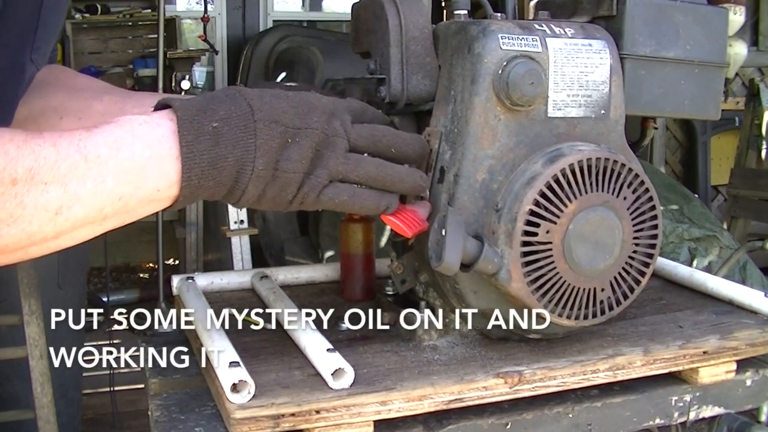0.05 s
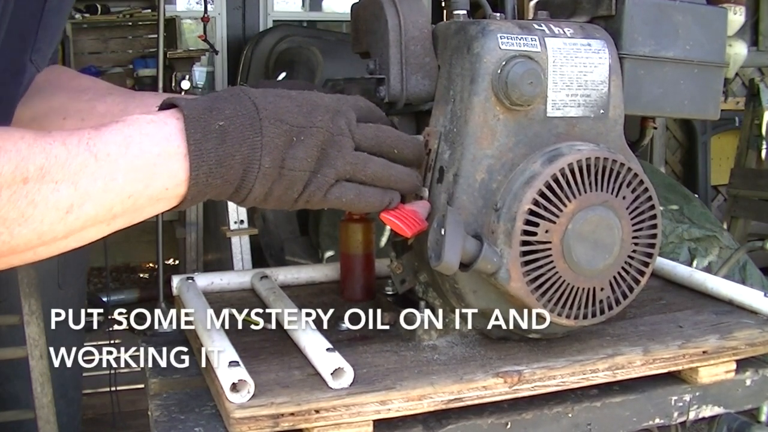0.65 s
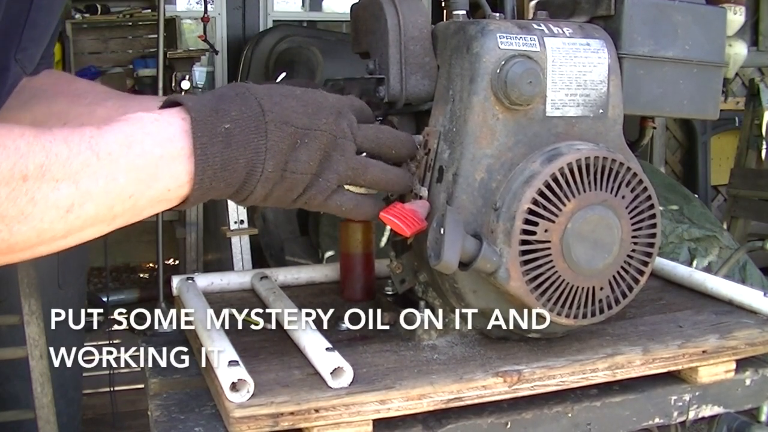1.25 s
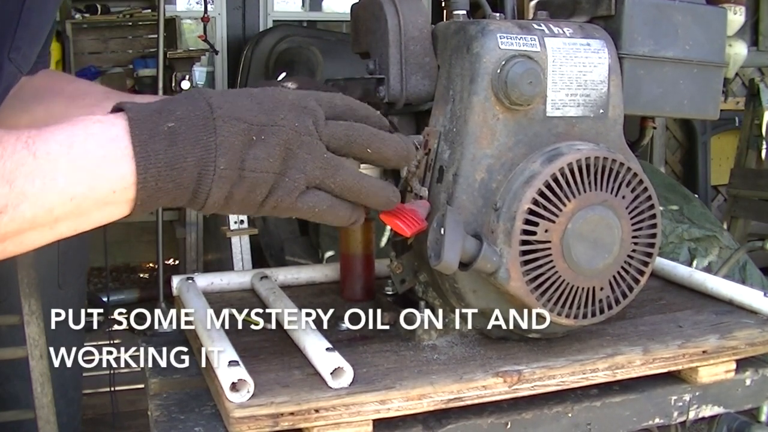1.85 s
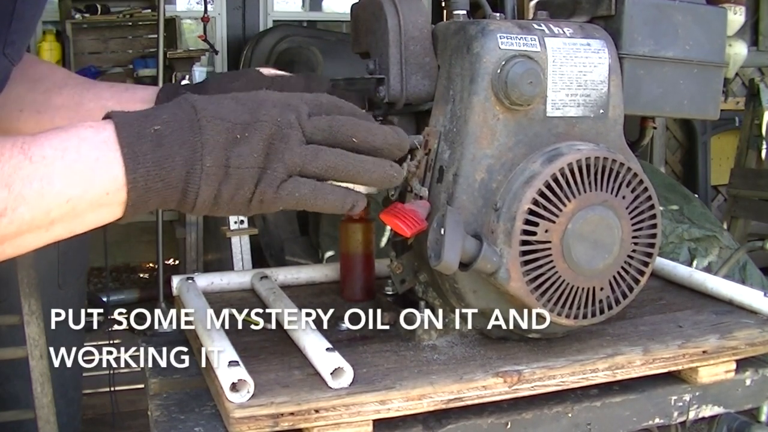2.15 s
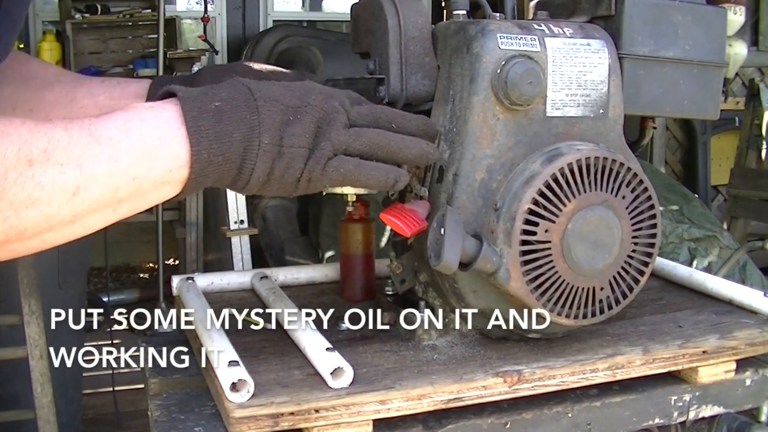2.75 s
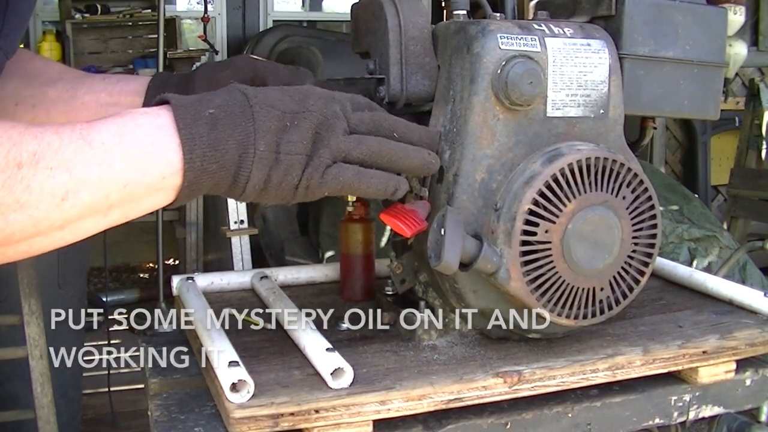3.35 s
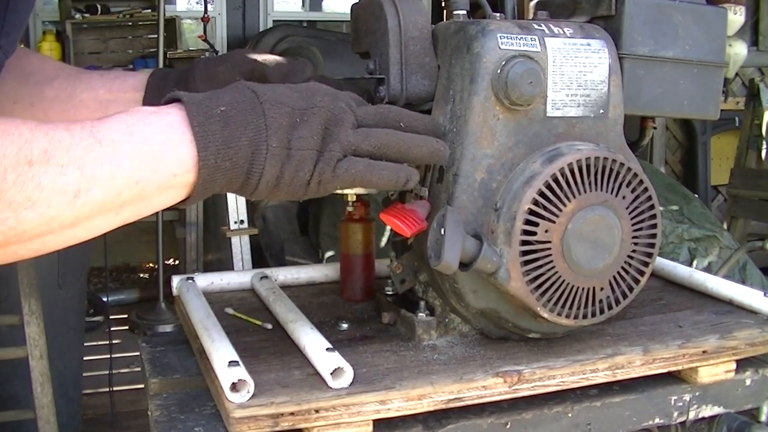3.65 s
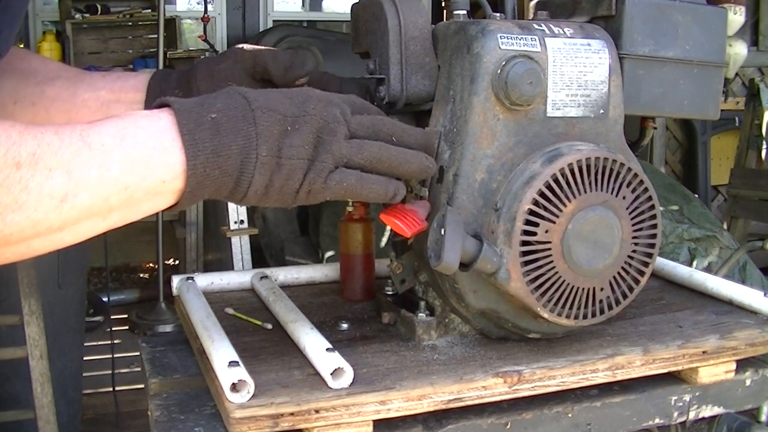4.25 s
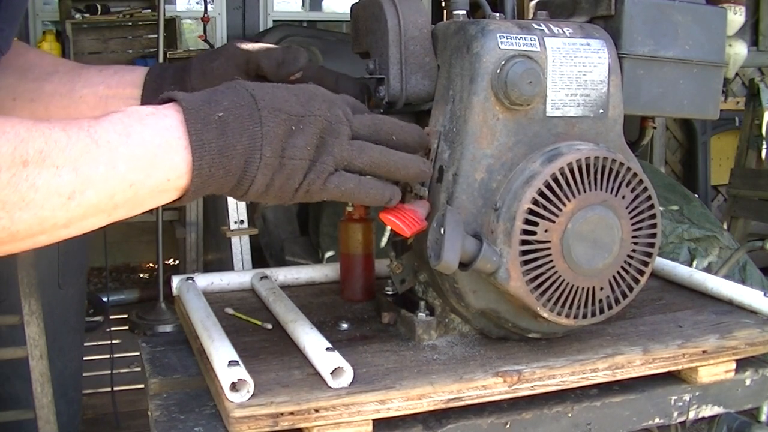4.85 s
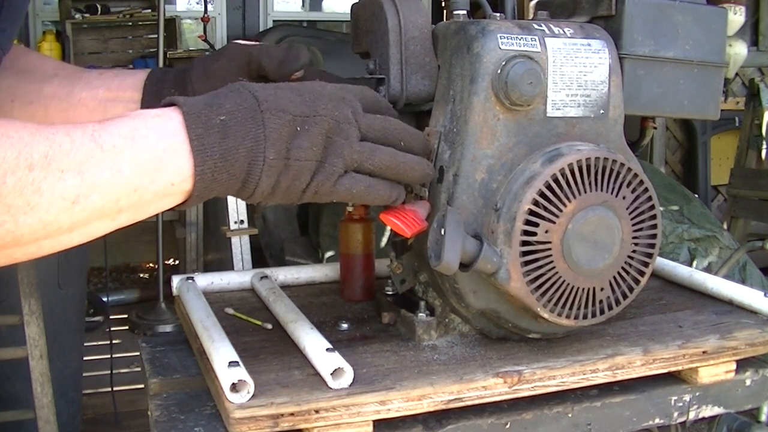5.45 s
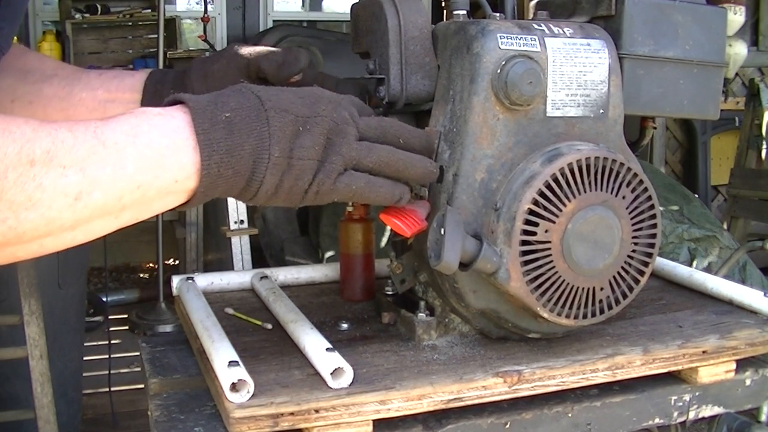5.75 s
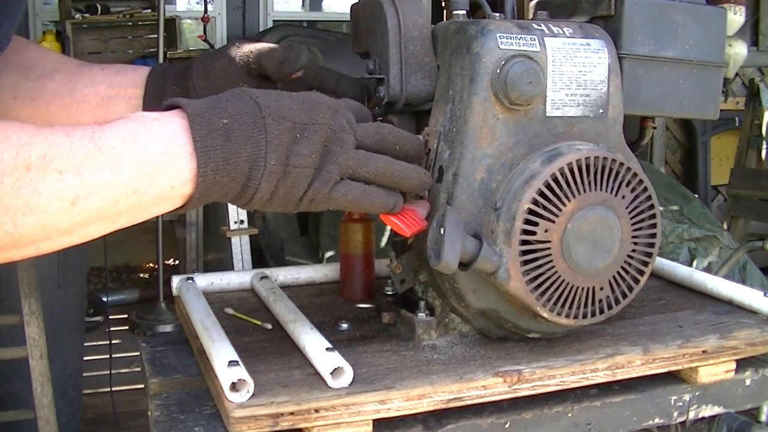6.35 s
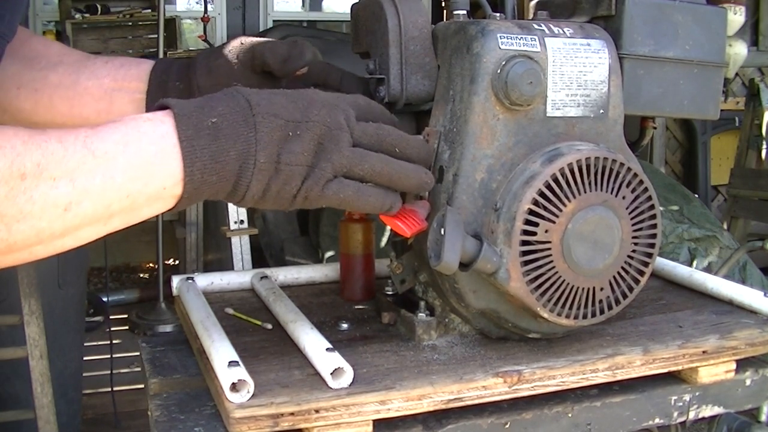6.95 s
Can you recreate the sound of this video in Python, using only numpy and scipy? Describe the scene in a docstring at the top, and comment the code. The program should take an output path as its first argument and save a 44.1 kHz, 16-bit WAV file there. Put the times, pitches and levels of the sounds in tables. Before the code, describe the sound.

Close, small metallic snaps alternate with duller clacks as a carburetor linkage is moved by hand on an engine that is not running. A return spring pings lightly and a glove rubs faintly on the metal. After a short weaker spell, the clicking settles into a regular back and forth. A breeze buffets the microphone with low, fluttering gusts over a quiet outdoor hush.

```python
"""Throttle linkage of a stopped engine

A gloved hand works the lever of a small engine back and forth on an outdoor bench. It snaps brightly
against one stop and clacks duller against the other, ringing the engine's metal. The return spring
pings, the glove rubs, a shed wall adds a short wash. Eddies of a breeze buffet the microphone."""
import sys
import numpy as np
from scipy import signal
from scipy.fft import rfft, irfft
from scipy.io import wavfile
from scipy.ndimage import uniform_filter1d

SR = 44100
rng = np.random.default_rng(int(sys.argv[2]) if len(sys.argv) > 2 else 0)


def pcm_store(signal):
    """Save signal as 16-bit PCM."""
    levels = np.round(np.clip(np.atleast_2d(signal), -1, 1) * 32767)
    wavfile.write(sys.argv[1], SR, levels.astype(np.int16).T)


N = 308964
TIME_S = np.arange(N) / SR
RING_TIME_S = np.arange(SR * 2 // 5) / SR
SIDES = np.array([[1], [-1]])   # left, right

# lever on the hard stop (time [s], relative low-band level [dB], treble over that [dB], rattle scale [s])
SNAPS = [(0.1832, -31.5, 4, 0.0014), (0.7397, -30, -10, 0.0065), (1.1488, -29, -2, 0.0018),
         (1.7343, -32.5, -2, 0.0039), (2.558, -37, -10, 0.0096), (3.566, -29, 0.1, 0.00079),
         (4.0035, -26.5, 1, 0.0012), (4.4217, -28, 1, 0.0014), (5.2143, -26.5, -1.2, 0.0022),
         (5.5629, -27.5, -0.5, 0.0017), (5.9256, -28, -4, 0.0027), (6.2667, -28, 0.1, 0.0025),
         (6.623, -28.5, 0.3, 0.002)]
# lever on the other stop (time [s], relative low-band level [dB], treble over that [dB], rattle scale [s])
CLACKS = [(0.002, -40, -12.5, 0.0079), (0.4179, -33.5, -9, 0.0031), (0.9547, -33, -9, 0.004),
          (1.293, -38.5, -9, 0.0019), (1.4463, -40.5, -6.5, 0.002), (1.6025, -40, -13.5, 0.0023),
          (2.7841, -34, -6.5, 0.0015), (3.0459, -45, -2, 0.0013), (3.2583, -35.5, -8, 0.0021),
          (4.1861, -35.5, -14.5, 0.00096), (4.6171, -31.5, -7.5, 0.0033), (4.8249, -33, -7, 0.0066),
          (5.0023, -31, -7.5, 0.0012), (5.3643, -39.5, -19, 0.0011), (5.7517, -33, -8.5, 0.001),
          (6.1108, -33, -11.5, 0.0013), (6.4401, -38.5, -20, 0.0014), (6.806, -41.5, -17.5, 0.00065)]
# carburetor and shroud (frequency [Hz], t60 without glove [s], snap height [dB], clack height [dB])
ENGINE_MODES = [ (642, .06, -14, -9), (800, .05, -16, -12), (897, .08, -12, -7), (1243, .07, -2, -7),
                (1420, .04, -16, -9), (1530, .07, -9, -1), (1580, .12, -9, -12), (1675, .5, -10, -7),
                (1712, .12, -3, 1), (1915, .09, -6, -12), (2060, .07, -9, -12), (2170, .05, -6, -8),
                (2252, .1, -2, -9), (2396, .085, -4, -7), (2700, .05, -11, -10), (2820, .05, -12, -8),
                (3012, .07, -9, -11), (3402, .05, -13, -22), (3700, .06, -14, -24), (4200, .06, -13, -18),
                (4620, .05, -16, -23), (5248, .06, -11, -25), (5610, .07, -20, -22), (6970, .03, -11, -29),
                (7268, .04, -11, -24), (7860, .04, -15, -33), (9310, .04, -16, -32), (9630, .045, -13, -26),
                (10700, .03, -18, -24)]
# weaker engine modes (frequency [Hz], snap height [dB], clack height [dB])
ENGINE_CROWD = [(268, -11, -16.5), (700, -26, -18), (1060, -11.5, -20), (1510, -24.5, -14),
                (1943, -4, -19.5), (2600, -15.5, -13.5), (3250, -15.5, -48), (4140, -17.5, -24.5),
                (6140, -29.5, -41), (7200, -23, -38.5), (8900, -28.5, -44), (10370, -15.5, -42.5),
                (12350, -40.5, -40.5), (14500, -73, -50)]
# decay of weaker modes, engine and spring (frequency [Hz], t60 [s])
CROWD_DECAY = [(300, 0.14), (2000, 0.065), (5000, 0.11), (12000, 0.099), (15000, .015)]
# spring and link slip in their holes (time [s], low-band level [dB], treble over that [dB])
PINGS = [(0.1535, -59, 11.5), (0.309, -51.5, -8.5), (0.336, -52, -21), (0.4941, -43, -16),
         (0.529, -47.5, -17), (0.663, -53.5, -19), (0.7014, -64, 13), (0.755, -33.5, -9),
         (0.768, -44.5, -7), (0.796, -37.5, -16), (1.098, -45.5, -7.5), (1.19, -42.5, -12),
         (1.333, -40, -25), (1.8745, -48.5, -22), (2.1548, -49, -20), (2.179, -50.5, -27),
         (2.577, -45, -33), (2.612, -49.5, -25), (2.768, -49, -7), (3.023, -47.5, -19), (3.1249, -46.5, -7),
         (3.5463, -46.5, 1.5), (3.7225, -43.5, -18), (3.751, -44.5, -25), (3.7809, -44, -31),
         (3.9402, -44, -16), (4.063, -40, -15), (4.1471, -42, -16), (4.5005, -46, -22),
         (4.5494, -41.5, -15), (4.808, -43.5, -11), (5.0802, -44, -3.5), (5.139, -47.5, 4),
         (5.1712, -40, -8), (5.185, -40, -4), (5.4355, -47.5, -3), (5.483, -47.5, -15), (5.6525, -44, -10),
         (5.8653, -48, -2.5), (5.973, -39, -19), (5.9979, -43.5, -3), (6.227, -46.5, -0.5),
         (6.4, -47.5, -9), (6.667, -34, -25)]
# return spring (frequency [Hz], t60 without glove [s], height [dB])
SPRING_MODES = [ (1254, .08, -11), (1520, .08, -9), (1712, .16, -1), (1781, .12, -2), (1918, .1, -4),
                (2056, .12, -1), (2150, .09, -5), (2400, .08, -9), (2695, .09, -11), (3407, .07, -13),
                (4178, .06, -16), (4753, .07, -9), (4830, .07, -10), (6900, .06, -15), (7256, .06, -13),
                (8672, .07, -10), (8909, .075, -7), (9300, .06, -11), (9620, .06, -11)]
# weaker spring modes (frequency [Hz], height [dB])
SPRING_CROWD = [(300, -20), (900, -12), (2000, -11), (2700, -22), (4800, -24), (6000, -30), (7200, -25),
                (10000, -27), (12500, -28), (15000, -46)]
# glove on the engine (time [s], relative level [dB])
RUB_LEVEL = [(0.0, -47), (0.86, -52), (1.21, -46.5), (2.13, -60), (2.96, -51), (3.39, -61), (4.21, -51.5),
             (4.92, -54), (5.27, -49.5), (5.95, -53), (6.11, -54), (6.5, -48), (6.69, -44.5), (7.01, -45)]
# glove noise (frequency [Hz], relative density [dB])
RUB_SPECTRUM = [(290, 0), (500, 1.5), (640, 4.5), (1000, -4.5), (1750, -12), (2200, -27), (3000, -22),
                (4500, -26), (7000, -22), (15000, -31)]
# a soft hiss, once (time [s], level [dB])
HISS_LEVEL = [(2.385, -77), (2.394, -48.5), (2.45, -49), (2.5, -51.5), (2.55, -53), (2.62, -60.5),
              (2.68, -77)]
# colour of that hiss (frequency [Hz], relative density [dB])
HISS_SPECTRUM = [(900, -28), (1500, 2.5), (2000, -4.5), (3200, -3.5), (4500, 5.5), (5600, -2.5),
                 (7000, -11), (11000, -17.5), (15000, -35)]
# breeze between gusts (time [s], level [dB])
BREEZE_LEVEL = [(0.0, -39), (0.14, -66), (0.33, -36.5), (1.1, -41.5), (1.75, -41), (1.93, -45.5),
                (2.05, -37), (3.2, -36), (3.72, -49.5), (4.03, -41.5), (4.8, -46.5), (5.02, -39),
                (5.35, -42.5), (5.85, -33), (6.4, -36), (7.01, -25.5)]
# gusts (start [s], hold [s], level [dB], left minus right [dB])
GUSTS = [(0.366, 0.16, -26.5, 4), (0.567, 0.082, -24.5, 6.5), (0.668, 0.037, -31, 10),
         (0.865, 0.12, -38.5, 9.5), (1.143, 0.047, -32.5, -1), (1.258, 0.088, -22.5, -1),
         (1.446, 0.013, -28.5, 3), (1.588, 0.04, -32, 2), (1.714, 0.019, -30.5, 10.5),
         (2.075, 0.0083, -23, -3.5), (2.181, 0.019, -28, 5), (2.38, 0.013, -24, 0.5), (2.451, 0.11, -26, 4),
         (2.582, 0.037, -24, 7.5), (2.665, 0.19, -33.5, 15), (2.967, 0.15, -22, 5), (3.114, 0.14, -29.5, 1),
         (3.353, 0.17, -39, 10.5), (3.89, 0.03, -29.5, 2), (4.154, 0.2355, -23.5, 0.5),
         (4.55, 0.03, -39.5, 14), (5.413, 0.024, -27, 4.5), (5.548, 0.16, -42, 16), (5.784, 0.014, -22, 2),
         (5.904, 0.11, -26.5, 1), (6.136, 0.16, -19, 0), (6.493, 0.17, -21, -1), (6.739, 0.18, -23, -0.5)]
# rumble in a full gust (frequency [Hz], relative density [dB])
BUFFET_SPECTRUM = [(20, -33), (55, -6.5), (105, -1), (165, 4), (240, -2), (330, -9.5), (460, -14),
                   (650, -33.5), (900, -30.5), (1200, -44.5)]
# small fast eddies (time [s], relative level [dB], left minus right [dB])
PUFFS = [(0.449, -9, 7), (0.497, -8, -9), (0.509, -6.5, 4), (1.314, -7.5, -17), (2.084, -11, -21),
         (2.38, -15.5, 17), (2.536, -11.5, -8), (2.772, -13, 22), (3.007, -10.5, 5), (3.07, -6, -13),
         (4.189, -6.5, -1), (4.336, -11, -15), (6.143, -10, -13), (6.522, -21, 5), (6.584, -8.5, 0),
         (6.996, -9, -16)]
# decay of the shed's wash (frequency [Hz], t60 [s])
SHED_DECAY = [(300, 0.15), (2000, 0.19), (5000, 0.21), (13000, 0.14)]
# outdoor background (frequency [Hz], relative density [dB])
AIR_SPECTRUM = [(60, -24), (100, 3.5), (150, -3), (550, -12.5), (900, -12.5), (1500, -21), (2500, -23.5),
                (5000, -31.5), (10500, -38.5), (16000, -45)]

TREBLE_HZ = 3200   # split between a hit's low band and its treble
SHROUD_HZ, SHROUD_T60_S = 1706, 0.78
GLOVE_LOSS = 0.0019   # added loss factor: high modes die sooner


def lever(hits, stop, crowd_db, sharpness, rebound):
    """The lever strikes stop 0 or 1; each drives the engine's modes differently."""
    out = np.zeros(N)
    modes = np.array(ENGINE_MODES)[:, [0, 1, 2 + stop]]
    crowd = np.array(ENGINE_CROWD)[:, [0, 1 + stop]]
    for time_s, level_db, treble_db, rattle_s in hits:
        ring = metal(modes, crowd, crowd_db, scatter_db=1.0, sharpness=sharpness)
        add_hit(out, time_s, rattle(ring, rattle_s, rebound), level_db, treble_db, span_s=0.041)
    return out


def metal(modes, crowd, crowd_db, scatter_db, sharpness):
    """Ring after one touch; the mix of modes shifts with the point of contact."""
    hz, t60_s, height_db = np.transpose(modes)[:, :, None]
    damping = np.log(1000) / t60_s + np.pi * hz * GLOVE_LOSS
    strength = from_db(height_db + scatter_db * rng.standard_normal(hz.shape))
    amplitude = strength * rng.choice([-1, 1], hz.shape) * 2 * damping / SR
    rings = amplitude * np.exp(-damping * RING_TIME_S) * np.sin(2 * np.pi * hz * RING_TIME_S)
    crack = 1 + sharpness * np.exp(-RING_TIME_S / 0.0019)   # small steel parts sound only briefly
    return rings.sum(axis=0) + from_db(crowd_db) * crack * dying_noise(crowd, CROWD_DECAY)


def dying_noise(spectrum, decay):
    """Countless close modes: third-octave noise bands, each dying at its own rate."""
    edges_hz, out = 200 * 2 ** (np.arange(20) / 3), 0
    for low_hz, high_hz in zip(edges_hz, edges_hz[1:]):
        hz = np.sqrt(low_hz * high_hz)
        fade = from_db(-60 * RING_TIME_S / at_hz(decay, hz))
        burst = rng.standard_normal(len(fade)) * fade / np.linalg.norm(fade)
        out = out + from_db(at_hz(spectrum, hz)) * filtered(burst, 2, [low_hz, high_hz], "band")
    return out


def rattle(ring, scale_s, rebound, count=6):
    """Loose parts touch again within three times scale_s, tending weaker."""
    out = ring.copy()
    for k, (when, size) in enumerate(rng.random((count, 2))):
        progress = (k + when) / count
        lag = 1 + int(3 * scale_s * progress * SR)
        out[lag:] += rebound * (.5 + size) * np.exp(-progress) * (-1) ** k * ring[:-lag]
    return out


def add_hit(track, time_s, ring, level_db, treble_db, span_s):
    """Force sets a hit's level, hardness its treble; both as rms over the first span_s."""
    for kind, band_db in (("low", level_db), ("high", level_db + treble_db)):
        band = filtered(filtered(ring, 2, TREBLE_HZ, kind), 2, TREBLE_HZ, kind)
        place(track, time_s, band * from_db(band_db) / rms(band[:int(span_s * SR)]))


def ticks(gain_db=26, decay_s=0.00013, band_hz=(7000, 12800)):
    """Steel meets steel: a tiny bright tick at first touch."""
    out = np.zeros(N)
    for time_s, level_db, treble_db, _ in SNAPS + CLACKS:
        tick = rng.standard_normal(len(RING_TIME_S)) * np.exp(-RING_TIME_S / decay_s)
        place(out, time_s, from_db(level_db + treble_db + gain_db) * tick / abs(tick).max())
    return filtered(out, 4, band_hz, "band")


def lead_in(hits, gain_db, rise_s=0.007):
    """A faint noise swells in the last few milliseconds before each hit."""
    swell = np.zeros(N)
    for time_s, level_db, *_ in hits:
        before_s = TIME_S[:int(time_s * SR)]
        swell[:len(before_s)] += from_db(level_db) * np.exp((before_s - time_s) / rise_s)
    hiss = noise([(300, -18), (1400, -3), (2300, 0), (4000, -10), (10000, -18), (15000, -34)])
    return from_db(gain_db) * swell * hiss


def spring(faint_db=-55, faint_treble_db=-22, max_lead_s=0.042, top_hz=11200):
    """Each slip is a gritty ping; a faint one leads each hit as the lever takes up slack."""
    out = np.zeros(N)
    faint = [(max(time_s - max_lead_s * rng.random(), 0), faint_db, faint_treble_db)
             for time_s, *_ in SNAPS + CLACKS]
    for time_s, level_db, treble_db in PINGS + faint:
        ring = metal(SPRING_MODES, SPRING_CROWD, crowd_db=0.5, scatter_db=4.0, sharpness=0.9)
        add_hit(out, time_s, rattle(ring, scale_s=.002, rebound=1.0), level_db, treble_db, span_s=0.024)
    return filtered(out, 2, top_hz, "low")


def shroud(drive, q=np.pi * SHROUD_HZ * SHROUD_T60_S / np.log(1000)):
    """The sheet-metal shroud rings at one pitch; the default q is for untouched metal."""
    return signal.lfilter(*signal.iirpeak(SHROUD_HZ, q, fs=SR), drive)


def glove(rub_db=-8, ring_db=-14):
    """The glove rubs unevenly on the engine and keeps the shroud ringing."""
    pressure = from_db(in_time(RUB_LEVEL) + 2.0 * drift(rate_hz=44))
    ring = shroud(rng.standard_normal(N), q=32)
    return pressure * (from_db(rub_db) * noise(RUB_SPECTRUM) + from_db(ring_db) * ring / rms(ring))


def brief_hiss():
    """A soft hiss rises once and fades."""
    return from_db(in_time(HISS_LEVEL) + 1.9 * drift(rate_hz=90)) * noise(HISS_SPECTRUM)


def wind(share=0.062, leak=0.34, leak_hz=107):
    """Each microphone port gets its own eddies and some of the other's, opposed in the deep bass."""
    left_db, right_db = port_levels_db()
    ports = np.array([buffet(left_db, full_gust_db=-15.0, steepening=0.44),
                      buffet(right_db, full_gust_db=-23.5, steepening=0.43)])
    deep = signal.sosfiltfilt(signal.butter(2, leak_hz, fs=SR, output="sos"), ports)
    return ports + (share * ports - leak * deep)[::-1]


def port_levels_db(breeze_pan_db=5, attack_s=0.0069, release_s=0.012):
    """A breeze from the left adds in power to gusts that rise, hold and die away."""
    power = from_db(in_time(BREEZE_LEVEL) + SIDES * breeze_pan_db / 2) ** 2
    for start_s, hold_s, level_db, pan_db in GUSTS:
        age_s = TIME_S - start_s
        swell = np.exp(np.minimum(age_s, 0) / attack_s - np.maximum(age_s - hold_s, 0) / release_s)
        power += (from_db(level_db + SIDES * pan_db / 2) * swell) ** 2
    return 10 * np.log10(power)


def buffet(level_db, full_gust_db, steepening):
    """Eddies on one port: fluttering rumble that loses its upper bands as the wind drops."""
    edges_hz, out = 20 * 2 ** (np.arange(13) / 2), 0
    lumps_db = 2.6 * drift(rate_hz=50)
    lull_db = np.minimum(level_db - full_gust_db, 0)
    for low_hz, high_hz in zip(edges_hz, edges_hz[1:]):
        hz = np.sqrt(low_hz * high_hz)
        band = filtered(rng.standard_normal(N), 3, [low_hz, high_hz], "band")
        octaves = np.log2(hz / 130)
        flutter_db = lumps_db * (1 + np.maximum(octaves, 0) / 2)   # small eddies vary most
        out += band * from_db(at_hz(BUFFET_SPECTRUM, hz) + steepening * octaves * lull_db + flutter_db)
    running_rms = np.sqrt(uniform_filter1d(out ** 2, size=SR // 18) + 1e-20)
    return from_db(level_db) * out / running_rms


def puffs(centre_hz=286, half_width_s=0.0035, gain_db=-4.5):
    """A small eddy crosses a port within a few cycles: a hollow pop."""
    out = np.zeros((2, N))
    offset_s = np.arange(SR // 20) / SR - .025
    envelope = np.exp(-(offset_s / half_width_s) ** 2)
    for time_s, level_db, pan_db in PUFFS:
        for port, side in zip(out, SIDES.ravel()):
            pitch, phase = rng.random(2)
            hz = centre_hz * 2 ** (pitch - .5)
            pop = envelope * np.cos(2 * np.pi * (hz * offset_s + phase))
            place(port, time_s + offset_s[0], from_db(level_db + gain_db + min(side * pan_db, 0)) * pop)
    return out


def shed(direct, wet_db, onset_s=0.0022):
    """Bench, clutter and shed wall return a faint, short wash."""
    wash = dying_noise([(300, 1.5), (2000, 0.5), (5000, -4.5), (12000, -17.5)], SHED_DECAY)
    return from_db(wet_db) * signal.fftconvolve(direct, wash * np.minimum(RING_TIME_S / onset_s, 1))[:N]


def air(level_db):
    """Steady outdoor hush."""
    return from_db(level_db) * noise(AIR_SPECTRUM)


def noise(spectrum):
    """Steady noise, rms 1, shaped by (frequency [Hz], relative density [dB])."""
    hz = np.maximum(np.fft.rfftfreq(N, 1 / SR), 1)
    x = irfft(rfft(rng.standard_normal(N)) * from_db(at_hz(spectrum, hz)), N)
    return x / rms(x)


def drift(rate_hz, hop=40):
    """Smooth random wander, rms 1."""
    pole = np.exp(-2 * np.pi * rate_hz * hop / SR)
    white = rng.standard_normal(N // hop + 2002)
    slow = signal.lfilter([1], [1, -2 * pole, pole * pole], white)[2000:]
    return np.interp(np.arange(N) / hop, np.arange(len(slow)), slow / rms(slow))


def filtered(x, order, hz, kind):
    return signal.sosfilt(signal.butter(order, hz, kind, fs=SR, output="sos"), x)


def place(track, time_s, sound):
    start = int(time_s * SR)
    track[start:start + len(sound)] += sound[:N - start]


def in_time(curve):
    return np.interp(TIME_S, *np.transpose(curve))


def at_hz(curve, hz):
    knots_hz, values = np.transpose(curve)
    return np.interp(np.log(hz), np.log(knots_hz), values)


def from_db(db):
    return 10 ** (np.asarray(db) / 20)


def rms(x):
    return np.sqrt(np.mean(x ** 2) + 1e-20)


def scene():
    """Linkage straight ahead, almost alike in both channels; wind differs per port."""
    snaps = from_db(-1.96) * lever(SNAPS, stop=0, crowd_db=0.0, sharpness=1.8, rebound=0.19)
    clacks = from_db(3.0) * lever(CLACKS, stop=1, crowd_db=-1.5, sharpness=3.7, rebound=0.24)
    lead_ins = lead_in(SNAPS, gain_db=-11.5) + lead_in(CLACKS, gain_db=-5.0)
    linkage = snaps + clacks + lead_ins + ticks() + spring()
    after_ring = shed(linkage, wet_db=-10.5) + from_db(-7.5) * shroud(linkage)
    mid = linkage + after_ring + glove() + brief_hiss() + air(level_db=-49.5)
    side = shed(linkage, wet_db=-28.0) + air(level_db=-60.5)
    return (mid + SIDES * side) * from_db(0.15 * SIDES) + wind() + puffs()


def record(dry):
    """Steep low-pass."""
    cutoff_hz = 16200
    return signal.sosfilt(signal.ellip(10, .1, 80, cutoff_hz, fs=SR, output="sos"), dry)


dry = scene()
out = record(dry)
pcm_store(out)
```